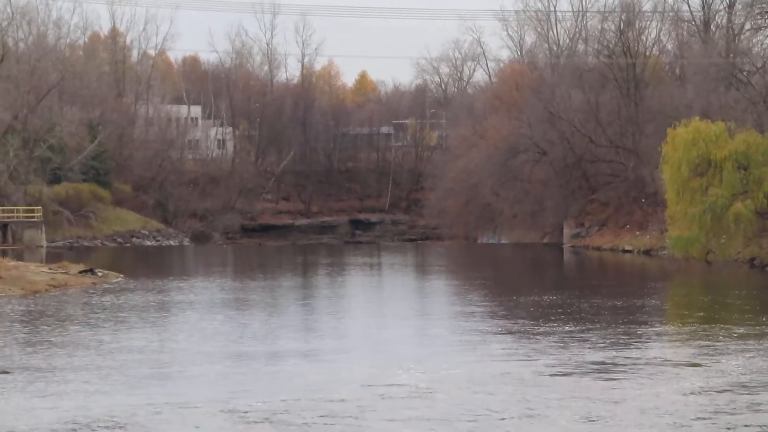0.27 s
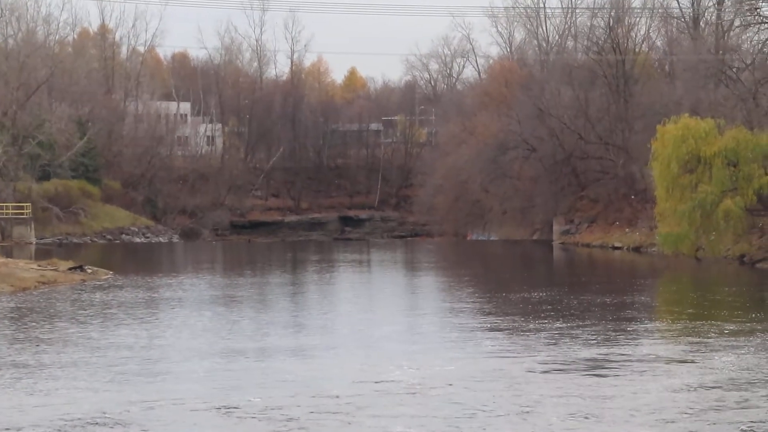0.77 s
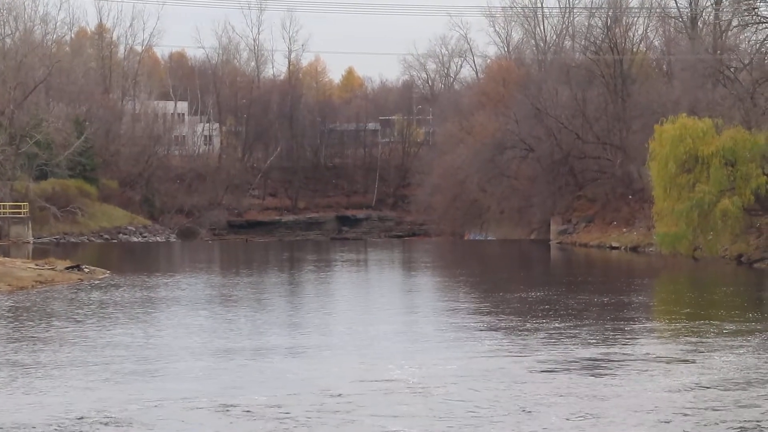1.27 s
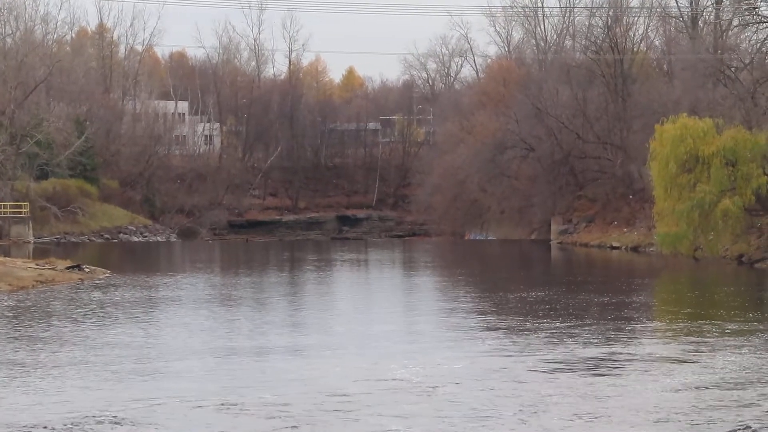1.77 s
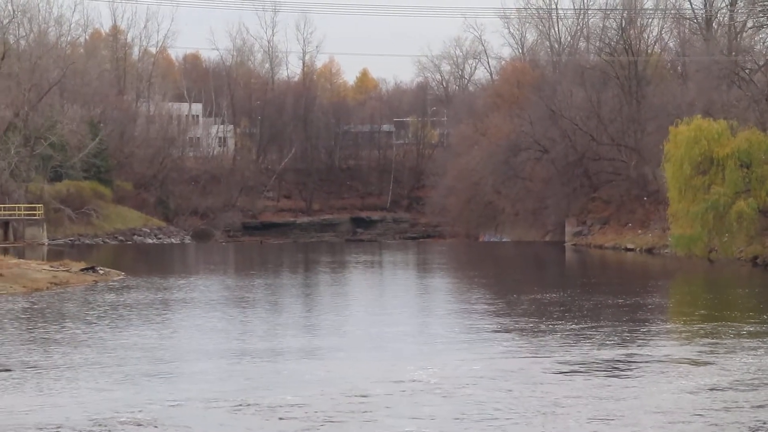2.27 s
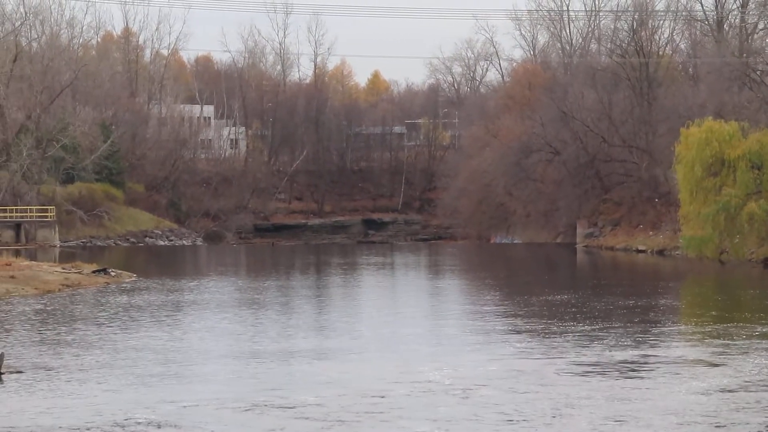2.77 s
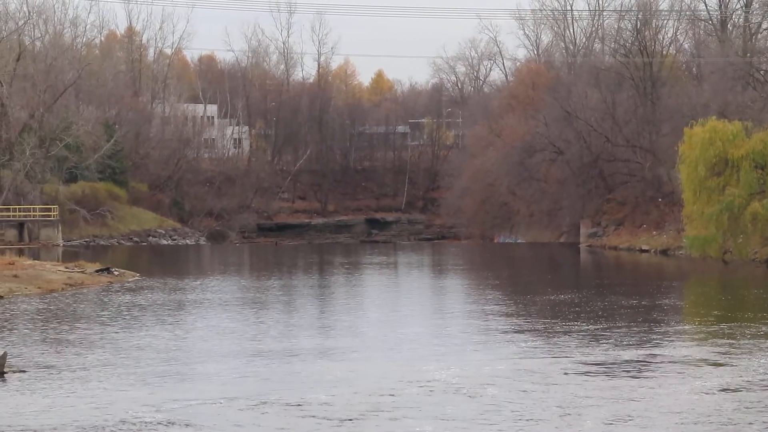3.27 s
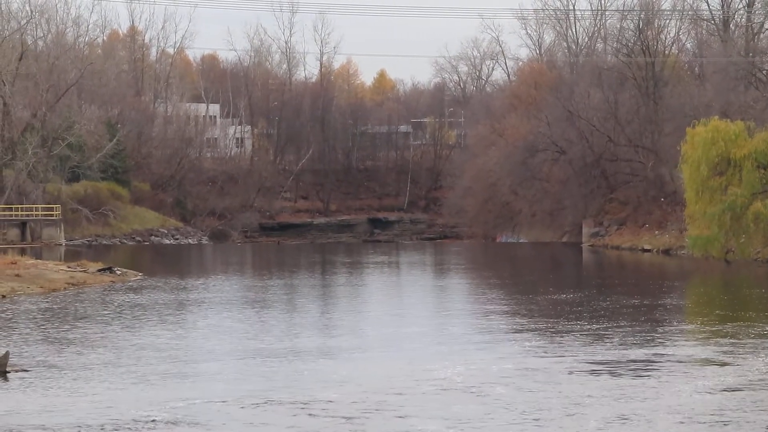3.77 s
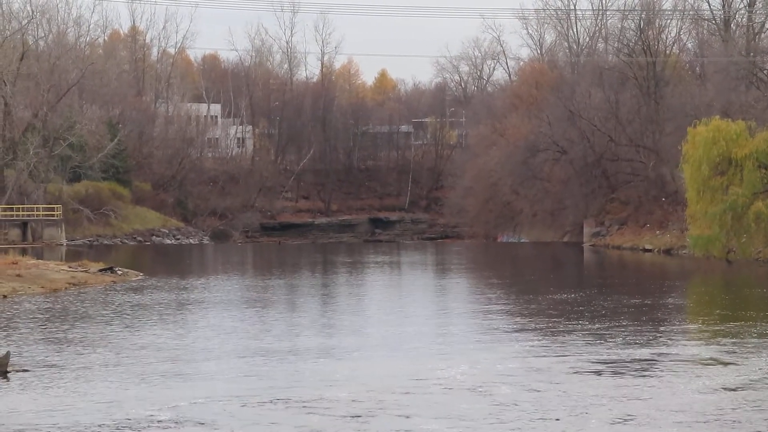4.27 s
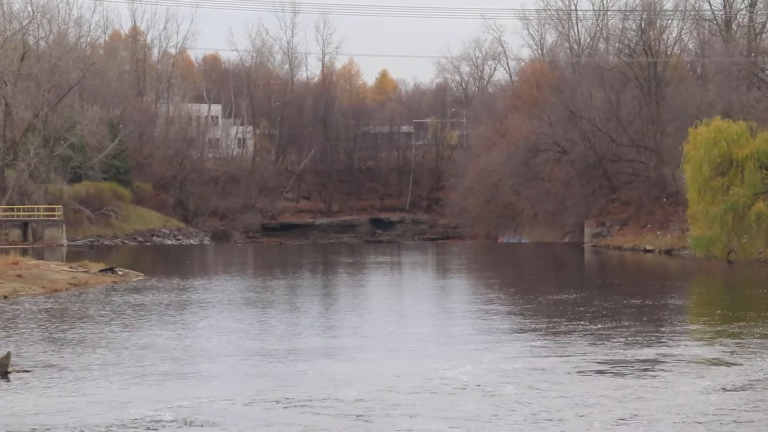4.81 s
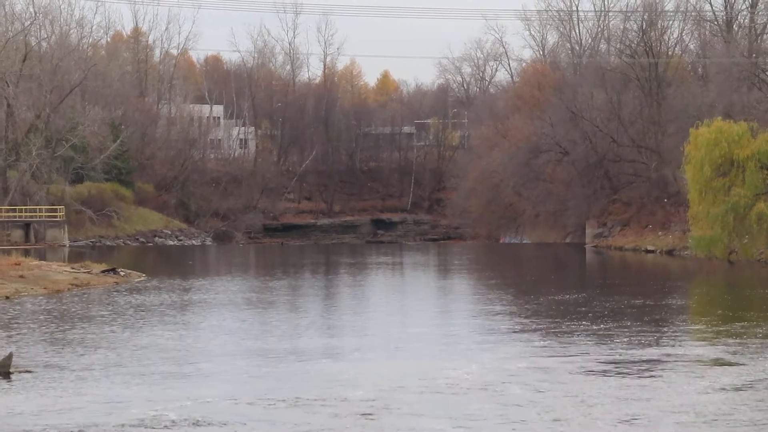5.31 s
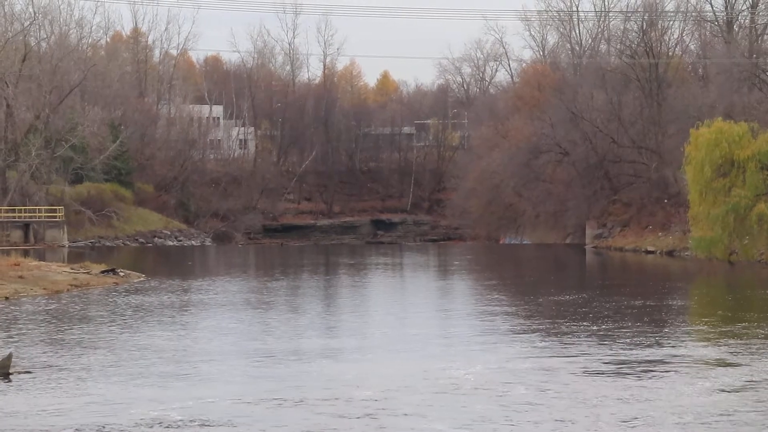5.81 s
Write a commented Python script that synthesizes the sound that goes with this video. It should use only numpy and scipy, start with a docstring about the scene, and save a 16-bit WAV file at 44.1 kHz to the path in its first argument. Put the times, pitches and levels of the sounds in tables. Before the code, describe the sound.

Outdoors by a river under a road bridge, close stereo microphone. Water rushes steadily over rapids with fine spray hiss. Traffic rumbles and tyres roar on the deck, with soft wheel thuds on a joint. A faint distant hum gives way to an engine climbing in pitch; it shifts up and drones lower while a second engine's hum rises.

```python
"""Beneath a road bridge a river rushes over rapids: filtered noise with random patches and tiny bursts.
Passing traffic adds broadband noise: the deck rumbles and drums, and tyres roar on its surface.
Wheels knock on a deck joint now and then: decaying noise bursts, partly through deck resonances.
Engines are sums of harmonics: a faint hum far off, a vehicle that pulls away, shifts up and drones on,
and a second one whose hum dips, then climbs. Two close microphone ports receive it all."""
import sys
import numpy as np
from scipy import signal
from scipy.fft import rfft, irfft, next_fast_len
from scipy.io import wavfile
from scipy.ndimage import uniform_filter1d, map_coordinates

SR = 44100
rng = np.random.default_rng(int(sys.argv[2]) if len(sys.argv) > 2 else 0)


def transcribe(u):
    """Save the signal u as a 16-bit wav file named by the first command-line argument.

    u: samples, shape (n,) or (channels, n), limited to [-1, 1]; the rate is SR.
    q: integer samples, one column per channel.
    """
    v = np.clip(np.atleast_2d(u).T, -1, 1)
    q = np.round(v * 32767).astype(np.int16)
    wavfile.write(sys.argv[1], SR, q)


N = 266805

# Spectral shapes of churning water and of spray: frequency_hz, density_db (relative, per Hz)
WATER_SPECTRUM = [(200, -13), (700, 1), (1700, 0.5), (2400, 0.5), (3000, -4.5), (4000, -10.5), (5200, -16),
                  (8000, -27.5), (14000, -55)]
SPRAY_SPECTRUM = [(2000, -12), (4000, -1.5), (5200, 0.5), (6400, -3), (8000, -8.5), (10000, -9.5),
                  (12000, -12.5), (13200, -18), (14500, -38)]
# Spectral shapes of the deck's rumble, the span's boom under a heavy load, the drumming deck
# and the tyre treads: frequency_hz, density_db (relative, per Hz)
RUMBLE_SPECTRUM = [(12, -50), (24, -27), (32, -9), (40, -1), (54, -4), (72, -5), (100, -4.5), (180, -22),
                   (500, -77)]
HEAVY_SPECTRUM = [(20, -30), (40, -1), (55, -4), (72, 7), (95, -4), (200, -47), (600, -120)]
DRUMMING_SPECTRUM = [(45, -15), (80, -5), (115, -1), (200, -2), (290, -3.5), (360, -6), (460, -10.5),
                     (620, -20.5), (1500, -65)]
TYRE_SPECTRUM = [(150, -26), (400, -4.5), (560, -0.5), (800, 1), (950, -1), (1200, -4), (1700, -8),
                 (2500, -21), (6000, -59)]
# Wheels on the joint: start_s, clack_db, thud_db (both before filtering)
KNOCKS = [(0.325, -16, -5), (0.61, -25, -4), (1.995, -26, -2), (2.016, -18, 2.5), (2.241, -26, 0),
          (3.802, -26, -3), (3.825, -30, -1), (3.842, -28, -1), (4.268, -27, -1)]
# Deck resonances excited by a thud: centre_hz, width_hz, gain_db
DECK_MODES = [(213, 115, 5), (278, 50, -19), (358, 51, 1), (470, 96, 2.5), (593, 150, -11),
              (955, 480, -3.5)]
# Filter of the clack: frequency_hz, gain_db
CLACK_FILTER = [(200, -16), (500, 9), (1200, 5), (2200, 6), (3200, 0), (4400, -1), (5200, -13), (6400, -17),
                (9000, -32), (14000, -50)]
# A car cruising further off: time_s, firing_rate_hz, level_db (of its first order)
CRUISER_COURSE = [(.33, 104.8, -30.5), (.7, 103.6, -31), (1, 105.7, -29), (1.2, 115, -27.5)]
# Second vehicle: time_s, firing_rate_hz, level_db (before each order's offset)
FOLLOWER_COURSE = [(3.72, 89.2, -31), (3.85, 92.3, -23.5), (4.13, 97, -23.5), (4.34, 101, -19),
                   (4.5, 100.4, -20.5), (4.63, 96.4, -30), (4.83, 113.9, -29), (5.04, 122.7, -21),
                   (5.2, 129.2, -23), (5.37, 137.9, -22), (5.78, 141.2, -19), (6.05, 148.7, -20.5)]
# First vehicle: time_s, base_rate_hz
LEADER_COURSE = [(1.22, 44.16), (1.39, 53.1), (1.53, 57.86), (1.9, 66.1), (2.35, 71.7), (2.62, 75.94),
                 (2.9, 80), (3.4, 86.7), (3.7, 90.5), (4, 96.4), (4.34, 101.8), (4.49, 101.2), (4.68, 89.5),
                 (4.89, 84.4), (5.5, 85.65), (5.88, 86.7), (6.05, 88.4)]
# Its throttle: time_s, load_db, brightness_db
THROTTLE = [(1.22, -3, 0), (1.4, -1, -1.5), (1.75, -0.5, -3.5), (2.05, -0.5, 0), (2.5, .5, -.5),
            (3.4, .5, 1), (3.85, -0.5, -1.5), (4.3, 0.5, -2.5), (4.52, -1, -4), (4.72, -2.5, -4.5),
            (4.95, 2, -6.5), (5.35, -3.5, -3.5), (6.05, -2, -4)]
# Its engine orders: multiple, level_db (before throttle and pipe), gain_per_brightness (dB per dB)
LEADER_ORDERS = [(1, -32.5, 0), (2, -23, 0), (3, -28.5, 1), (4, -31.5, 1.1), (5, -39.5, 1), (6, -41, 0.2)]
# Peaks and dips of its exhaust pipe, which every order sweeps through: frequency_hz, gain_db
PIPE_RESPONSE = [(85, -4), (95, -2.5), (106, 7), (125, 0), (133, -13), (147, 0), (160, -1.5), (175, 1.5),
                 (188, -3.5), (203, -8), (224, 0), (238, -3), (250, 1), (262, 2), (276, -8.5), (328, -5),
                 (360, 6), (372, 6), (392, -2), (470, 0.5), (520, -1.5)]
# Between the ports, side relative to mid: frequency_hz, side_minus_mid_db (before a common trim)
PORT_WIDTH = [(60, -59), (110, -36), (200, -27), (370, -18.5), (680, -25.5), (1240, -18.5), (2280, -14.5),
              (4170, -5.5), (7650, 0), (14000, 10)]
# Between the ports, tilt of level: frequency_hz, left_minus_right_db
PORT_LEAN = [(60, 0.0), (110, 0.31), (200, 0.73), (370, 0), (680, 0.57), (1240, 1.95), (2280, 1.4),
             (4170, 1.5), (7650, 1.5), (14000, 0.22)]

CHURN_DB, SPRAY_DB = -32, -48
# The hiss is duller for the first moment
DULL_UNTIL_S, DULL_DB, DULL_FROM_HZ = 0.236, -3, 3700
RUMBLE_DB = -30.5
# Passing loads: level and time at the nearest point, time from there to half power
HEAVY_DB, HEAVY_PASS_S, HEAVY_SPAN_S = -28.5, 2.6, 0.2
DECK_DB, DECK_PASS_S, DECK_SPAN_S = -23, 2.56, 3.6
TYRE_DB, TYRE_FADE_DB_PER_S = -24.5, 0.39  # starting level; the roar slowly recedes
RUBBER_HZ = 1400  # the soft tyre dulls a thud above this
ECHO_DB, ECHO_DELAY_S, ECHO_T60_S = -18, 0.07, 0.9  # the wooded banks answer the engines
TOP_HZ = 14600


def amp(db):
    """Decibel law: level in dB to amplitude gain."""
    return 10 ** (np.asarray(db) / 20)


def unit(x):
    """Power normalisation: x at rms 1."""
    return x / np.sqrt(np.mean(x ** 2) + 1e-20)


def along(points, hz):
    """Logarithmic frequency scale: (Hz, value) points interpolated on a log axis."""
    f, v = np.transpose(points)
    return np.interp(np.log(hz + 1), np.log(f + 1), v)


def curves(rows):
    """Linear interpolation in time: one value per sample for each column after the time."""
    s, *columns = np.transpose(rows)
    t = np.arange(N) / SR
    return [np.interp(t, s, column) for column in columns]


def wobble(rate):
    """Slow random modulation: a smooth curve through random knots, rate of them a second."""
    knots = rng.standard_normal(int(N * rate / SR) + 4)
    return map_coordinates(knots, [np.arange(N) * rate / SR])


def filtered(x, response):
    """Linear filtering: the spectrum of x times a complex response of frequency."""
    m = next_fast_len(N + SR // 2)
    hz = np.fft.rfftfreq(m, 1 / SR)
    return irfft(rfft(x, m) * response(hz), m)[..., :N]


def coloured(x, spectrum):
    """Spectral shaping: x filtered by the given curve, then set to rms 1."""
    return unit(filtered(x, lambda hz: amp(along(spectrum, hz))))


def rush(spectrum, patchy_db):
    """Turbulent noise: two unrelated signals share random gain patches in time and frequency."""
    z = signal.stft(rng.standard_normal((2, N)), nperseg=512)[2]
    field = rng.standard_normal(z.shape[1:])
    field = uniform_filter1d(field, size=6, axis=0)  # across frequency
    field = uniform_filter1d(field, size=12, axis=1)  # across time
    patchy = signal.istft(z * amp(patchy_db * unit(field)), nperseg=512)[1][:, :N]
    return coloured(patchy, spectrum)


def passing(nearest_s, span_s):
    """Inverse-distance law: gain of a source driving past, 1 at the nearest point."""
    return 1 / np.hypot(1, (np.arange(N) / SR - nearest_s) / span_s)


def rapids():
    """Turbulence and splashing: slightly surging churn under spray with tiny bursts of uneven size."""
    churn = amp(CHURN_DB + 0.42 * wobble(14)) * rush(WATER_SPECTRUM, patchy_db=1.07)

    struck = rng.random(N) < 1200 / SR  # about 1200 bursts a second
    size = amp(3 * rng.standard_normal(N))
    bursts = rng.standard_normal((2, N)) * struck * size
    spray = rush(SPRAY_SPECTRUM, patchy_db=2.0) + amp(-7.5) * coloured(bursts, SPRAY_SPECTRUM)

    water = churn + amp(SPRAY_DB) * spray
    dulled = filtered(water, lambda hz: amp(DULL_DB * (1 - 1 / (1 + (hz / DULL_FROM_HZ) ** 6))))
    return np.where(np.arange(N) / SR < DULL_UNTIL_S, dulled, water)


def road():
    """Structure-borne and tread noise: the bridge rumbles, booms and drums while tyres roar on it."""
    rumble = amp(RUMBLE_DB) * coloured(rng.standard_normal((2, N)), RUMBLE_SPECTRUM)

    boom = coloured(rng.standard_normal((2, N)), HEAVY_SPECTRUM)
    heavy = amp(HEAVY_DB) * passing(HEAVY_PASS_S, HEAVY_SPAN_S) * boom

    drum_gain = amp(DECK_DB + 0.35 * wobble(8)) * passing(DECK_PASS_S, DECK_SPAN_S)
    drumming = drum_gain * rush(DRUMMING_SPECTRUM, patchy_db=0.8)

    roar_gain = amp(TYRE_DB - TYRE_FADE_DB_PER_S * np.arange(N) / SR)
    roar = roar_gain * rush(TYRE_SPECTRUM, patchy_db=0.87)
    return rumble + heavy + drumming + roar


def blow(start_s, t60_s):
    """Impulsive excitation: a noise burst that decays exponentially by 60 dB in t60_s."""
    t = np.arange(N) / SR
    return (t >= start_s) * amp(-60 * np.abs(t - start_s) / t60_s) * rng.standard_normal(N)


def deck_response(hz):
    """Modal superposition: the deck's resonances added with alternating sign."""
    total = 0
    for k, (centre, width, db) in enumerate(DECK_MODES):
        mode = 1j * hz * width / (centre * centre - hz * hz + 1j * hz * width)
        total = total + (-1) ** k * amp(db) * mode
    return total


def joint():
    """Impact: a wheel gives a sharp clack and a longer thud in the deck's modes, dulled by rubber."""
    clacks = sum(amp(db) * blow(s, t60_s=0.035) for s, db, _ in KNOCKS)
    thuds = sum(amp(db) * blow(s, t60_s=0.048) for s, _, db in KNOCKS)
    clack_sound = filtered(clacks, lambda hz: amp(along(CLACK_FILTER, hz)))
    thud_sound = filtered(thuds, lambda hz: deck_response(hz) / (1 + (hz / RUBBER_HZ) ** 4))
    return clack_sound + thud_sound


def exhaust(rows, rate_hz, orders, flutter_db, jitter):
    """Harmonic series: far off only low orders carry; higher ones flutter more in the moving air."""
    t = np.arange(N) / SR
    since_start, until_end = t - rows[0][0], rows[-1][0] + 0.099 - t
    heard = np.clip(np.minimum(since_start, until_end) / 0.055, 0, 1)  # 55 ms fades
    phase = 2 * np.pi * np.cumsum(rate_hz) / SR + jitter * wobble(25)  # jitter in radians
    total = 0
    for k, db in orders:
        gain = amp(db + k * flutter_db * wobble(18))
        total = total + gain * np.sin(k * phase + rng.uniform(0, 2 * np.pi))
    return np.sqrt(2) * heard * total  # sqrt 2: a sine of rms 1


def cruiser():
    """Two harmonics of the firing rate: a faint hum, nearly level, that rises at its end."""
    hz, db = curves(CRUISER_COURSE)
    return exhaust(CRUISER_COURSE, hz, [(1, db), (2, db - 9.5)], flutter_db=1.2, jitter=0.12)


def follower():
    """Two harmonics of the firing rate: a deep hum with a weak overtone."""
    hz, db = curves(FOLLOWER_COURSE)
    orders = [(1, db - 0.1), (2, db - 23)]
    return exhaust(FOLLOWER_COURSE, hz, orders, flutter_db=0.2, jitter=0.035)


def leader():
    """Source and filter: throttle brings out overtones, which swell as they cross the pipe's peaks."""
    hz, = curves(LEADER_COURSE)
    load_db, bright_db = curves(THROTTLE)
    orders = []
    for k, db, follows in LEADER_ORDERS:
        pipe_db = along(PIPE_RESPONSE, k * hz)
        orders.append((k, db + pipe_db + load_db + follows * bright_db))
    return exhaust(LEADER_COURSE, hz, orders, flutter_db=0.39, jitter=0.029)


def banks(x):
    """Diffuse reflection: the banks' echo beats against a gliding pitch and makes the hum waver."""
    t = np.arange(SR) / SR
    tail = rng.standard_normal(SR) * (t > ECHO_DELAY_S) * amp(-60 * t / ECHO_T60_S)
    return x + amp(ECHO_DB) * signal.fftconvolve(x, tail / np.linalg.norm(tail))[:N]


def ports(mid, scattered, direct_share):
    """Phase lead: sound reaches the left port first, the difference a quarter cycle ahead of the mid."""
    ahead = filtered(mid, lambda hz: 1j)
    difference = np.sqrt(direct_share) * ahead + np.sqrt(1 - direct_share) * scattered
    side = filtered(difference, lambda hz: amp(along(PORT_WIDTH, hz) - 0.8))
    both = np.array([mid + side, mid - side])
    # half of the level difference goes to each port
    return filtered(both, lambda hz: amp(np.outer([0.5, -0.5], along(PORT_LEAN, hz))))


def scene():
    """Superposition: river, road, joint and echoing engines add at the two ports."""
    direct, scattered = rapids() + road()
    engines = banks(cruiser() + follower() + leader())
    return ports(direct + joint() + engines, scattered, direct_share=0.4)


def record(dry):
    """Band limitation: nothing at or above TOP_HZ is kept."""
    return filtered(dry, lambda hz: hz < TOP_HZ)


dry = scene()
out = record(dry)
transcribe(out)
```